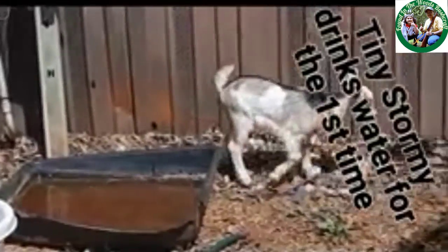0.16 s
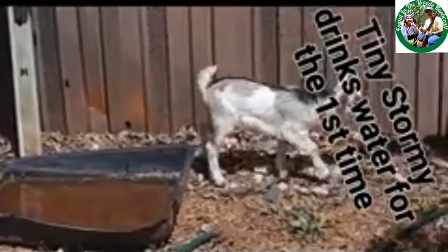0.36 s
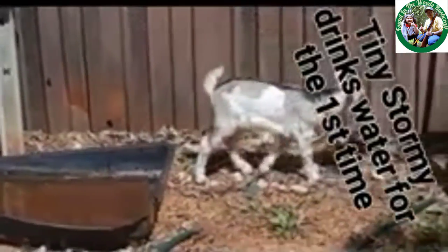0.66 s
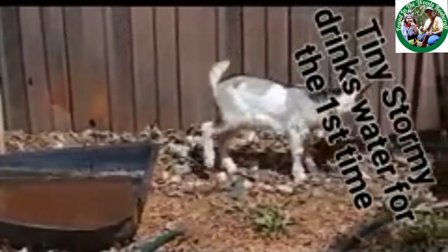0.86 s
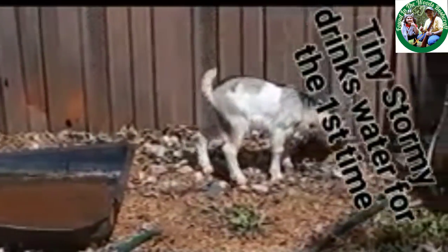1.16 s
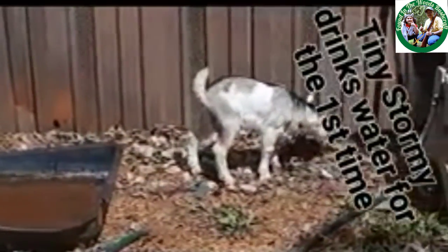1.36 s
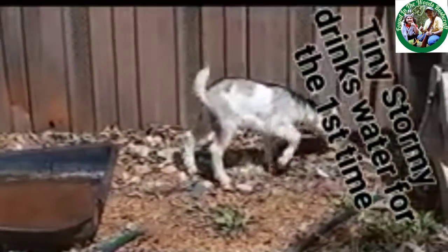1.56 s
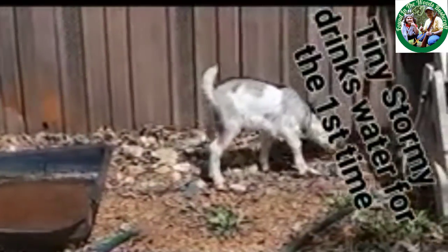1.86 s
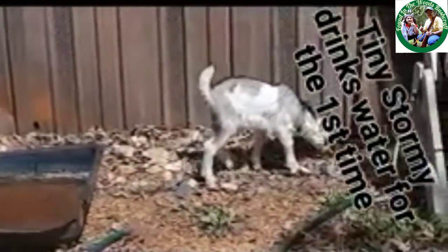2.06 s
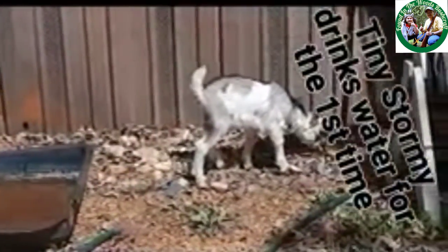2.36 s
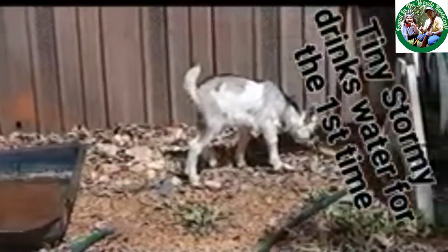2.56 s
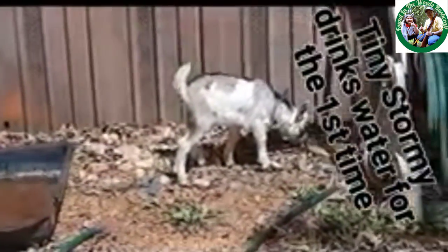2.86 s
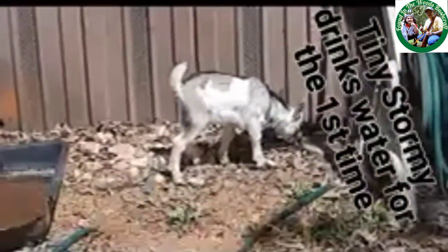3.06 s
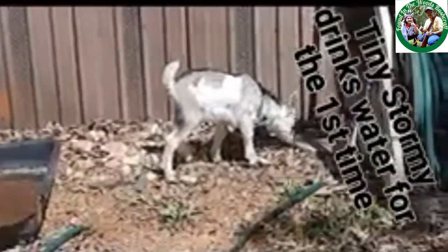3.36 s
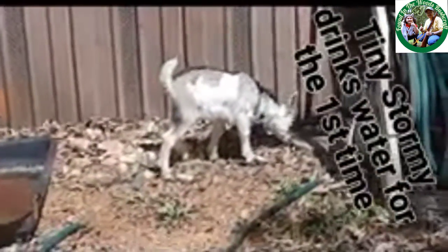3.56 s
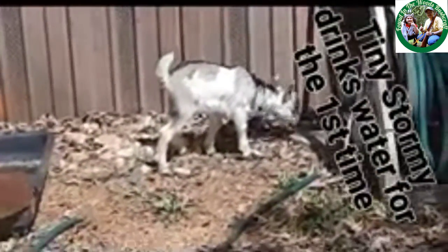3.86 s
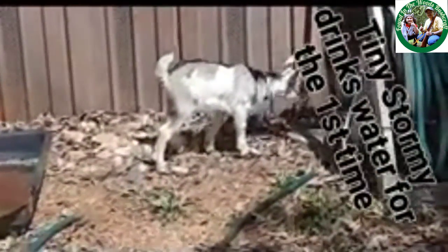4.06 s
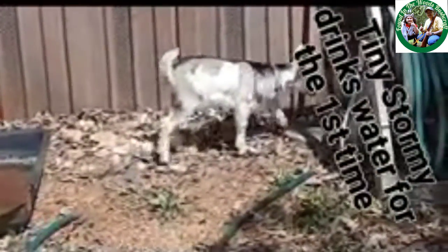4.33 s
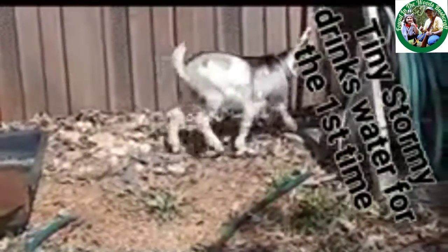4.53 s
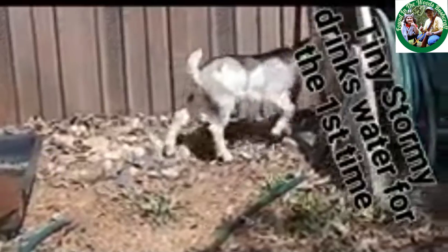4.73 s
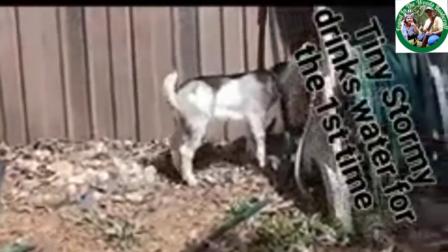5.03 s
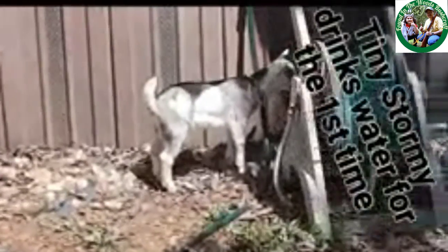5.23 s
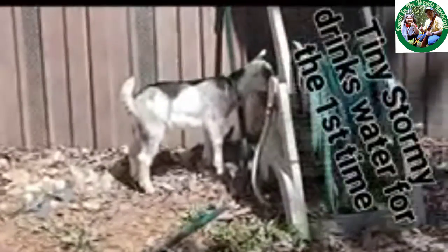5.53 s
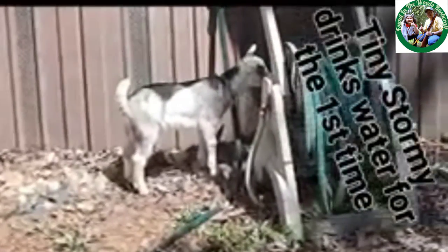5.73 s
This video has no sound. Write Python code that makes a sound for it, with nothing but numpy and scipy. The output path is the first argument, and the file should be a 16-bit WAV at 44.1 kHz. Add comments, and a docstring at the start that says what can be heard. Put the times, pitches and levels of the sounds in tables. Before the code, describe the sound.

Close leaf rustles and crunches open the scene, with a deep fluttering hum and soft wind bumps on the microphone. The hum stops and light steps continue, faint birds whistling far away. Then a young goat cries out in two high notes, short and long, clear at first, quavering, then rough and thin. It stops and soft leafy noise fades in the open yard.

```python
"""Bleating goat kid by a fence

A goat kid walks over dry leaves beside a wooden fence, then bleats high: a short note and a long one,
breaking back and forth between a clear tone (stacked harmonics) and a rasp (noise in bursts).
Early on, and twice more later, something whirs like a hummingbird's wings: pushes and swishes of air.
Puffs of air rock the microphone, birds whistle far off as gliding fuzzy tones, and a faint drone swells."""
import sys
import numpy as np
from scipy import signal
from scipy.fft import rfft, irfft, next_fast_len
from scipy.io import wavfile
from scipy.ndimage import uniform_filter1d

SR = 44100
rng = np.random.default_rng(int(sys.argv[2]) if len(sys.argv) > 2 else 0)


def master(y):
    """Save y as 16-bit WAV."""
    cut = np.clip(np.atleast_2d(y).T, -1, 1)
    pcm = np.round(cut * 32767)  # scale
    wavfile.write(sys.argv[1], SR, pcm.astype(np.int16))


N = 259749
TIME = np.arange(N) / SR  # seconds


def amp(db):
    """Decibels to gain."""
    return 10 ** (np.asarray(db) / 20)


def evened(x):
    """Scale a sound to an rms of 1."""
    return x / np.sqrt(np.mean(x ** 2) + 1e-20)


def read(points, hz):
    """Look up a spectrum's value at any frequency, between its points on a log scale."""
    f, value = np.transpose(points)
    return np.interp(np.log(hz + 1), np.log(f + 1), value)


def curves(rows):
    """Draw each column of a table as a control running over the whole time."""
    s, *columns = np.transpose(rows)
    return [np.interp(TIME, s, c) for c in columns]


def during(rows):
    """Give 1 while a table lasts and 0 elsewhere, with soft edges."""
    inside = (TIME >= rows[0][0]) & (TIME <= rows[-1][0])
    return uniform_filter1d(1. * inside, size=300)


def colour(x, points):
    """Shape a sound by a spectrum, and scale it to an rms of 1."""
    gain = amp(read(points, np.fft.rfftfreq(N, 1 / SR)))
    return evened(irfft(rfft(x) * gain, N))


def noise():
    """White noise for the whole time."""
    return rng.standard_normal(N)


def wander(rate_hz, step=16):
    """Smooth random motion with an rms of 1, mostly slower than the given rate."""
    # made at one point per 16 samples, then joined up by straight lines
    count = next_fast_len(N // step + 2)
    smoothing = np.exp(-(np.fft.rfftfreq(count, step / SR) / rate_hz) ** 2)
    slow = irfft(rfft(rng.standard_normal(count)) * smoothing, count)
    return np.interp(np.arange(N) / step, np.arange(count), evened(slow))


def fuzzy_tone(hz, width):
    """Noise in a narrow band that follows a pitch."""
    turn = 2 * np.pi * np.cumsum(hz * np.ones(N)) / SR
    return evened(wander(width / 2) * np.cos(turn) + wander(width / 2) * np.sin(turn))


def slurs(rows):
    """Fuzzy tones, each gliding evenly through its pitch while it swells and fades."""
    out = np.zeros(N)
    for start, length, hz, glide, width, db in rows:
        part = np.clip((TIME - start) / length, 0, 1)
        pitch = hz + glide * length * (part - .5)
        out += amp(db) * np.sin(np.pi * part) * fuzzy_tone(pitch, width)
    return out


def burst(start, length, attack, release, db, swell_db=0):
    """An envelope: attack, a hold that may swell or sag, release."""
    u = np.maximum(TIME - start, 0)
    fall = np.minimum(np.maximum(u - length, 0) / release, 20)
    hold = amp(db + swell_db * np.minimum(u, length))
    return hold * np.tanh((u / attack) ** 2) * np.exp(-fall)


# Colour of the quiet air. Each row: frequency in Hz, strength in dB.
AIR_COLOUR = [(15, -35), (25, -2), (70, -8.5), (120, -1.5), (199, -16.5), (297, -10.5), (340, -14.5),
              (549, -21), (959, -31.5), (1360, -31), (2780, -37), (3440, -40.5), (5130, -43.5),
              (13000, -43), (14500, -59)]
# How the distant drone swells. Each row: time in seconds, level in dB.
DRONE_SWELL = [(0, -70), (2.2, -99), (2.55, -58.5), (2.9, -55.5), (3.2, -70.5), (3.55, -65.5), (5.9, -60)]


def outdoors(air_db=-62):
    """Quiet air is noise that barely wavers; a distant drone is noise gathered near 280 Hz."""
    drone_colour = [(100, 9), (200, -12), (280, 10.0), (380, -4.0), (600, -35.0), (1200, -45.5),
                    (3000, -73.5)]  # Hz, dB
    air = amp(air_db + 0.26 * wander(26)) * colour(noise(), AIR_COLOUR)
    return air + amp(curves(DRONE_SWELL)[0]) * colour(noise(), drone_colour)


# How long echoes last. Each row: frequency in Hz, time to die by 60 dB in seconds.
ECHO_TIMES = [(200, 1), (1400, 0.78), (3000, 0.4), (8000, 0.024)]


def yard(x):
    """Scattered reflections from fence and trees; the treble dies first."""
    hz, t, z = signal.stft(rng.standard_normal(SR), SR, nperseg=256)
    decay = amp(-60 * t / read(ECHO_TIMES, hz)[:, None])
    late = t > .012  # the first reflections take a moment to arrive
    tail = signal.istft(z * decay * late, SR, nperseg=256)[1]
    return signal.fftconvolve(x, tail / np.linalg.norm(tail))[:N]


# Whistles of far birds. Each row: start in seconds, length in seconds, pitch halfway in Hz,
# glide in Hz per second, width in Hz, level in dB before the split into direct sound and echo.
BIRD_WHISTLES = [(.03, .29, 2556, -3800, 900, -69.5), (1.9, 0.2, 3780, -3600, 450, -72),
                 (2.015, 0.2, 3400, 1500, 447, -65)]


def birds(direct_db=-8, echo_db=-1):
    """Far whistles glide in pitch, and are heard mostly by their echoes from the gardens."""
    song = slurs(BIRD_WHISTLES)
    return amp(direct_db) * song + amp(echo_db) * yard(song)


# Faint narrow hisses. Each row: start in seconds, length in seconds, pitch halfway in Hz,
# glide in Hz per second, width in Hz, level in dB.
FAINT_HISSES = [(0.01, .84, 6490, -240, 1250, -69), (.575, 0.19, 1347, 5.5, 220, -59),
                (2.05, 2.2, 1343, -4, 190, -77.5), (3.1, 0.6, 6350, -140, 1050, -77.5),
                (3.3, .36, 547, -32.5, 260, -64.5), (5.44, .72, 1364, 10.5, 15.6, -53)]


def hisses():
    """Faint bands of noise swell, drift slightly in pitch and fade."""
    return slurs(FAINT_HISSES)


# Puffs of air on the microphone. Each row: middle in seconds, strength in dB before the boost
# they all share, rocking rate in Hz.
AIR_PUFFS = [(0.08, -35, 66), (0.129, -38, 66.6), (0.226, -34.5, 82), (0.299, -36.5, 78.6),
             (0.475, -30.5, 79), (.518, -26, 77.13), (0.594, -24, 72.6), (0.67, -27.5, 83),
             (0.81, -27.5, 103), (0.854, -39.5, 71), (0.925, -45.5, 66), (1.414, -42.5, 72.6),
             (2.147, -40, 72), (2.848, -41, 74), (2.894, -36, 65.7), (2.942, -38, 69.5), (4.206, -41, 88),
             (4.264, -39.5, 83.6), (4.482, -37.5, 55.2), (4.742, -37, 60.4)]


def puffs(length=0.0065, boost_db=5.0):
    """Each eddy rocks the microphone's diaphragm for a cycle or two."""
    out, unevenness = np.zeros(N), wander(89)
    for s, db, hz in AIR_PUFFS:
        u = TIME - s
        swell = np.exp(-np.hypot(u / length, 1) + 1)
        out += amp(db) * swell * np.cos(2 * np.pi * (hz * u + rng.random()) + .5 * unevenness)
    return out * amp(boost_db)


# The whir, one list for each pass.
# Each row: time in seconds, wing beats per second, level of the hum in dB.
WING_PASSES = [
    [(0, 69, -54.5), (.08, 68, -46.5), (.15, 62.7, -45.5), (.27, 65.6, -43.5), (.53, 63.7, -41),
     (.63, 68, -39), (.71, 63.4, -38.5), (.775, 67, -41), (.82, 86, -51)],
    [(3.58, 83, -55), (3.66, 70.7, -42), (3.8, 66, -42.5), (3.9, 81, -77)],
    [(5.56, 72, -59), (5.68, 62.6, -49), (5.78, 66, -51.5), (5.9, 68, -46)],
]
# Make-up of the wing hum. Each row: frequency in Hz, strength in dB.
WING_HUM = [(62, -8), (126, 5.5), (186, 1.5), (250, -17.5), (315, -14.5), (380, -11), (440, -10), (500, -9),
            (570, -9), (635, -6.5), (750, -21.5), (930, -25.5), (1150, -40), (1380, -32.5), (1520, -33)]


def wings(swish_db=-8.5, swish_growth=0.65, full_db=-41):
    """Every wing beat is a push of air with a short swish that grows with effort."""
    swish_colour = [(150, 6), (340, 10.0), (550, 10.5), (720, -22.5), (930, 1), (1150, -28),
                    (1380, -8.5), (1650, -17.0), (4000, -36.0), (8000, -34.5)]  # Hz, dB
    out = np.zeros(N)
    for rows in WING_PASSES:
        hz, db = curves(rows)
        turn = 2 * np.pi * np.cumsum(hz * (1 + .007 * wander(25))) / SR
        scatter = rng.uniform(-1.3, 1.3, 24)  # the partials do not all start together
        push = sum(amp(read(WING_HUM, k * hz.mean())) * np.cos(k * turn + scatter[k])
                   for k in range(1, len(scatter)))
        stroke = np.exp(.8 * np.cos(turn))  # louder once a beat
        swish = colour(noise() * stroke, swish_colour)
        swish_gain = amp(swish_db + swish_growth * (db - full_db))  # against the push
        out += during(rows) * amp(db) * (evened(push) + swish_gain * swish)
    return out


# Colour of the dry leaves. Each row: frequency in Hz, strength in dB.
LEAF_COLOUR = [(1180, -24), (2000, -8), (2380, -8.5), (2610, -16.5), (3630, -8), (4580, -15), (6930, -2),
               (8320, -4), (9500, -8), (13200, -1.5), (14500, 0)]
# Hooves drag through dry leaves. Each row: middle in seconds, half length in seconds, level in dB.
LEAF_RUSTLES = [(0.022, 0.039, -50), (0.25, 0.052, -64), (0.513, 0.35, -66.5), (0.712, 0.047, -49.5),
                (.82, 0.055, -83), (0.983, .012, -60.5), (1.072, .04, -68), (1.221, 0.055, -67),
                (1.432, 0.026, -63), (1.643, 0.13, -66.5), (1.774, 0.033, -57), (1.881, 0.061, -62.5),
                (2.764, 0.042, -80), (3.375, 0.23, -71.5)]
# Single crunches, and last a long soft noise that fades after the bleat.
# Each row: start in seconds, crackle in dB, decay in seconds, dull soil-like noise in dB.
CRUNCHES_AND_FADE = [(0.021, -56, 0.13, -60.5), (0.155, -47, 0.005, -69), (0.279, -47, 0.009, -52),
                     (0.367, -57, 0.013, -72), (0.618, -50, 0.025, -55.5), (0.747, -45.5, 0.032, -51.5),
                     (.978, -68, 0.053, -57.5), (1.417, -59.5, 0.011, -79), (1.744, -58, 0.009, -82),
                     (1.778, -42, 0.0089, -71), (1.854, -54, 0.015, -92), (2.619, -79, 0.025, -67),
                     (2.741, -73, 0.018, -90), (3.341, -68, 0.024, -85), (4.7, -53, 0.056, -65),
                     (5.129, -51.5, 0.063, -83), (5.665, -65, 0.78, -54.5)]


def leaves(snaps_per_s=1500, attack_s=0.00098):
    """Dry leaves give many tiny snaps; a hoof adds a crunch and a scuff; a long soft noise ends it."""
    soil_colour = [(150, -7.5), (650, 12.5), (950, 0), (1280, 1.5), (1700, -1), (2500, -9),
                   (5000, -25.0), (10000, -44)]  # Hz, dB
    snaps = noise() * (rng.random(N) < snaps_per_s / SR)
    snap_gain = amp(3.5 * np.minimum(rng.exponential(1, N), 4))  # a few snaps are much louder
    crackle = colour(evened(snaps * snap_gain) + 1.1 * noise(), LEAF_COLOUR)
    soil = colour(noise(), soil_colour)
    out = np.zeros(N)
    for s, half, db in LEAF_RUSTLES:
        out += crackle * amp(db) * np.exp(-((TIME - s) / half) ** 2)
    for s, db, decay, dull_db in CRUNCHES_AND_FADE:
        u = np.maximum(TIME - s, 0)
        envelope = (1 - np.exp(-u / attack_s)) * np.exp(-u / decay)
        out += envelope * (amp(db) * crackle + amp(dull_db) * soil)
    return out


# Second tones of the voice. Each row: start in seconds, length in seconds, pitch halfway in Hz,
# glide in Hz per second, width in Hz, level in dB.
VOICE_CRACKS = [(3.588, 0.044, 1655, 2602.5, 45, -28.5), (3.775, 0.078, 976, -450, 45, -43),
                (4.16, .055, 1005, 1399.5, 45.6, -38), (4.172, .056, 2040, 2400, 44, -28),
                (4.358, 0.02, 2052, -3.5, 45, -26.5), (5.638, 0.0243, 575, -2000, 90, -36.5)]


def cracks():
    """Where the voice cracks, a second tone slides beside the first."""
    return slurs(VOICE_CRACKS)


# Effort of the voice. Each row: time in seconds, level in dB.
VOICE_EFFORT = [(3.575, -74.5), (3.61, -40), (3.65, -35), (3.8, -36), (3.85, -61), (3.93, -53.5),
                (3.98, -35.5), (4.15, -37), (4.5, -33), (4.7, -32), (4.75, -47), (4.83, -35.5),
                (5.25, -37.5), (5.32, -40.5), (5.64, -49), (5.76, -66.5)]
# The low harmonics, 1 to 4, against the effort.
# Each row: level in dB with the mouth open, level in dB with it closed.
LOW_HARMONICS = [(-1.5, 0), (0, -3.5), (-10.5, -27), (-11, -28)]
# The voice clears and one harmonic rings out in the throat. Each row: start in seconds,
# length in seconds, harmonic number, level in dB, swell in dB per second.
THROAT_RINGS = [(3.625, 0.057, 3, -24, -57), (3.635, 0.059, 2, -29.5, 14), (3.719, 0.025, 2, -25, -3),
                (3.742, .04, 3, -28, 3), (3.805, 0.088, 2, -34.5, -110), (3.967, 0.069, 3, -27.5, 10),
                (3.991, 0.059, 4, -37.5, 3), (4.039, .1, 1, -23.5, -3), (4.046, 0.038, 2, -26, -60),
                (4.089, 0.069, 3, -31.5, -4.5), (4.114, 0.15, 4, -56, -4), (4.23, 0.028, 3, -37, 10),
                (4.25, 0.274, 1, -24, -10.5), (4.269, 0.039, 2, -26, 119.5), (4.291, 0.06, 4, -56, 9),
                (4.3, 0.19, 2, -17, -37.5), (4.507, .22, 3, -46, 4), (4.699, 0.087, 2, -34, 77),
                (4.741, 0.068, 4, -44.5, -10), (5.266, 0.16, 2, -34.5, -4.5), (5.419, 0.197, 4, -49, 24),
                (5.425, 0.2145, 2, -23.5, -11.5)]
# The folds break into a rasp. Each row: start in seconds, length in seconds, level in dB.
RASP_BREAKS = [(3.587, 0.021, -37.5), (3.688, 0.039, -37.5), (3.765, 0.068, -32.5), (3.951, 0.024, -31),
               (3.977, 0.0048, -28), (4.151, .065, -31), (4.214, 0.0033, -25), (4.356, 0.017, -34),
               (4.534, 0.013, -33.5), (4.576, 0.037, -35), (4.84, 0.578, -38), (4.853, 0.021, -33.5),
               (4.893, .008, -29.5), (4.918, 0.015, -30.5), (5.042, 0.021, -30.5), (5.109, .046, -37),
               (5.626, 0.024, -38.5)]


def voicing(closing_from_s=4.21, closing_s=0.67, rasp_open_db=-13, rasp_closed_db=-25.5):
    """Levels of the four low harmonics and of the rasp, from effort, mouth, rings and breaks."""
    effort_db, = curves(VOICE_EFFORT)
    closed = np.clip((TIME - closing_from_s) / closing_s, 0, 1)  # the mouth closes slowly
    levels = [amp(effort_db + open_db + (closed_db - open_db) * closed)
              for open_db, closed_db in LOW_HARMONICS]
    for start, length, harmonic, db, swell_db in THROAT_RINGS:
        k = int(np.clip(round(harmonic), 1, len(levels))) - 1
        ring = burst(start, length, 0.018, 0.0078, db, swell_db)  # attack s, release s
        levels[k] = np.hypot(levels[k], ring)
    # some rasp is always there while the voice sounds
    steady_db = rasp_open_db + (rasp_closed_db - rasp_open_db) * closed
    rasp = amp(effort_db + steady_db) * during(VOICE_EFFORT)
    for start, length, db in RASP_BREAKS:
        attack_s = min(0.006, 0.27 * length)  # short breaks start faster
        rasp = np.hypot(rasp, burst(start, length, attack_s, 0.025, db))
    return levels, rasp


# Melody of the bleat, a short note and then the long one. Each row: time in seconds, pitch in Hz.
BLEAT_MELODY = [(3.62, 555), (3.635, 690), (3.77, 712), (3.82, 695), (3.97, 705), (4, 725), (4.095, 763),
                (4.22, 725), (4.31, 770), (4.38, 771), (4.48, 762), (4.55, 732), (4.68, 738), (4.78, 715),
                (4.88, 740), (5.2, 735), (5.41, 713), (5.44, 688), (5.55, 683), (5.65, 667)]
# How tight the throat is. Each row: time in seconds, tightness from 0 to 1.
THROAT_STRAIN = [(3.6, 0.24), (3.66, 0.68), (3.85, 0.26), (4.0, 0.05), (4.7, 0), (4.81, 0.98), (5.4, 0.99),
                 (5.45, 0.28), (5.66, 0.84)]
# Colour of the rasp, throat open and then tight. Each row: frequency in Hz, strength in dB.
OPEN_RASP = [(120, -4), (400, -56.5), (620, 4.5), (820, -6), (1000, -10), (1180, -16.5), (1600, 2),
             (2080, 6.5), (2480, -17.5), (3000, -7.5), (3500, -51), (4400, -42), (5000, -59)]
TIGHT_RASP = [(120, -17.5), (420, -30.5), (570, 2.5), (680, -36.5), (950, -8), (1100, -18), (1340, 5),
              (1600, -3), (1860, 9), (2200, -20.5), (2460, -6), (2800, -45), (3600, -36), (5000, -42)]
# Colour of the treble, throat open and then tight. Each row: frequency in Hz, strength in dB.
OPEN_TREBLE = [(2800, 1), (3700, 3), (4550, -2), (4950, -18.5), (5400, -11), (6050, -4), (7000, -9),
               (7700, -10), (10000, -19.5), (11500, -12), (14000, -25)]
TIGHT_TREBLE = [(2800, -6.5), (4100, -16), (4650, 4.5), (5250, 2.5), (5750, -6), (6150, 1.5), (6700, -19.5),
                (8300, -15), (9400, -14), (10500, -37.5), (12500, -18.5), (14000, -31)]
# Strength of the treble. Each row: time in seconds, level in dB.
TREBLE_LEVEL = [(3.58, -80), (3.6, -57.5), (3.77, -52), (3.93, -78), (4.01, -47.5), (4.04, -55),
                (4.11, -49.5), (4.14, -44.5), (4.2, -52), (4.24, -46.5), (4.28, -48.5), (4.31, -45),
                (4.44, -52), (4.69, -51), (4.78, -62.5), (4.81, -52.5), (4.91, -50), (5.4, -48.5),
                (5.48, -58), (5.64, -51), (5.7, -68.5), (5.76, -73)]


def goat():
    """Vocal folds sing a harmonic stack, and break into irregular bursts of rasp."""
    flutter_db, sway_db, flicker_db, grit_db = 3.5, 1.0, 3.5, 1.5
    rasp_takes, breath_db, smear = 0.62, -27, 0.17
    flap_hz, flap_depth = 165, 0.23
    quaver_s, quaver_period_s, quaver_half_s, quaver_dip_db = 4.429, 0.031, 0.0072, -5.5

    levels, rasp_level = voicing()
    hz, = curves(BLEAT_MELODY)
    tight = np.clip(curves(THROAT_STRAIN)[0], 0, 1)
    sounding = during(VOICE_EFFORT)
    rasp_level = np.hypot(rasp_level, amp(breath_db) * levels[1] * sounding)
    # the more rasp against tone, the less steady each cycle is
    rough = rasp_level / (rasp_level + levels[0] + levels[1])
    # the share of hiss in the treble grows with roughness, most of all in a tight throat
    hiss = np.clip(0.33 + rough * (0.2 + 0.65 * tight), 0, .95)
    turn = 2 * np.pi * np.cumsum(hz * (1 + (.002 + .016 * rough) * wander(260))) / SR

    tone = 0
    for k, level in enumerate(levels, 1):
        # rasp takes its energy from the overtones; the fundamental holds on
        kept = np.clip(1 - rasp_takes * rough * (k > 1), 0, 1)
        flutter = flutter_db * k * rough * wander(79)
        sway = sway_db * (k + 0.5) * (1 - tight) * wander(30)
        tone = tone + kept * level * amp(flutter + sway) * np.sqrt(2) * np.sin(k * turn)
    # in rough stretches a slower flapping of the folds puts side tones around each harmonic
    flap = np.cos(2 * np.pi * np.cumsum(flap_hz * (1 + 0.13 * wander(37.9))) / SR)
    tone = tone * (1 + flap_depth * rough * flap)
    # after its peak the voice quavers: three quick dips
    dips = sum(np.exp(-((TIME - quaver_s - i * quaver_period_s) / quaver_half_s) ** 2)
               for i in range(3))
    tone = tone * amp(quaver_dip_db * dips)

    upper = 0
    for k in range(5, 21):
        open_db, tight_db = read(OPEN_TREBLE, k * hz), read(TIGHT_TREBLE, k * hz)
        throat_db = (1 - tight) * open_db + tight * tight_db
        uneven_db = 4.5 * wander(9) + flicker_db * wander(45)
        phase = k * turn + smear * (1 + rough) * wander(93)
        upper = upper + amp(throat_db + uneven_db) * np.sin(phase)
    upper = upper / np.sqrt(uniform_filter1d(upper ** 2, size=2000) + 1e-9)  # evened moment by moment

    # air escapes once a cycle, in uneven clumps
    bursts = noise() * (1 + 1.55 * np.cos(turn)) * amp(grit_db * np.tanh(wander(150)))
    rasp = (1 - tight) * colour(bursts, OPEN_RASP) + tight * colour(bursts, TIGHT_RASP)
    air = (1 - tight) * colour(bursts, OPEN_TREBLE) + tight * colour(bursts, TIGHT_TREBLE)
    treble = np.sqrt(1 - hiss) * upper + np.sqrt(hiss) * air
    treble = amp(curves(TREBLE_LEVEL)[0]) * treble
    return sounding * (tone + treble) + rasp_level * rasp


def scene():
    """The kid and its steps echo from the fence; wings, puffs and far sounds lie around them."""
    near = goat() + cracks() + leaves()
    echo = amp(-21) * yard(near)
    return (outdoors() + birds() + hisses() + puffs() + wings() + echo + near)[None]


def record(dry):
    """The microphone sheds deep rumble below 44 Hz; the recorder cuts off above 14300 Hz."""
    lean = signal.sosfilt(signal.butter(2, 44, "high", fs=SR, output="sos"), dry)
    band_limit = signal.firwin(511, 14300, window=("kaiser", 9), fs=SR)
    return signal.oaconvolve(lean, band_limit[None], "same")


dry = scene()
out = record(dry)
master(out)
```